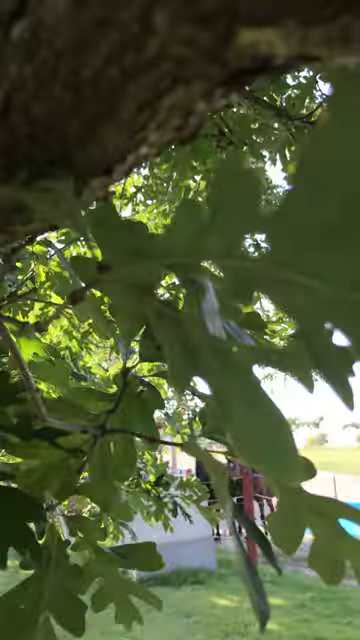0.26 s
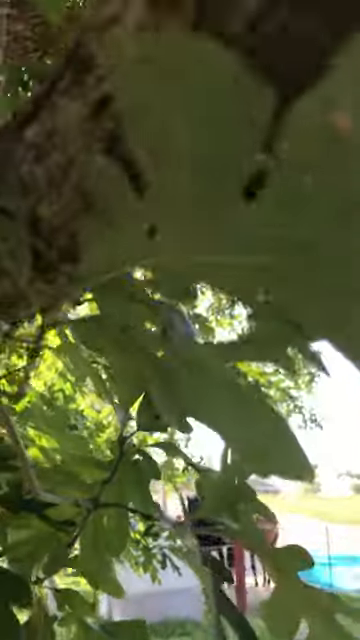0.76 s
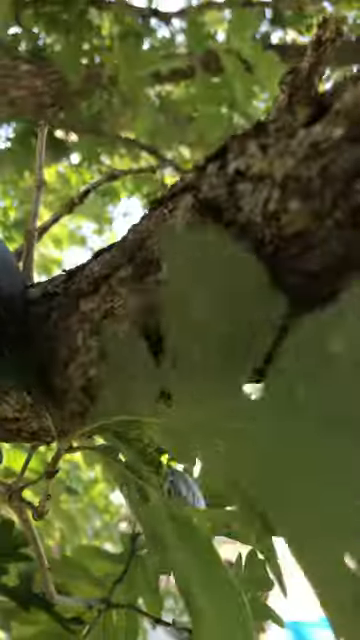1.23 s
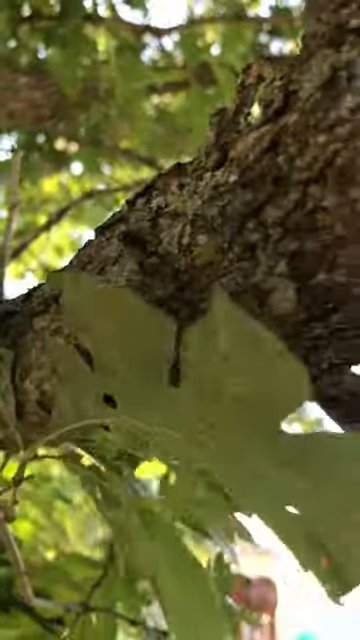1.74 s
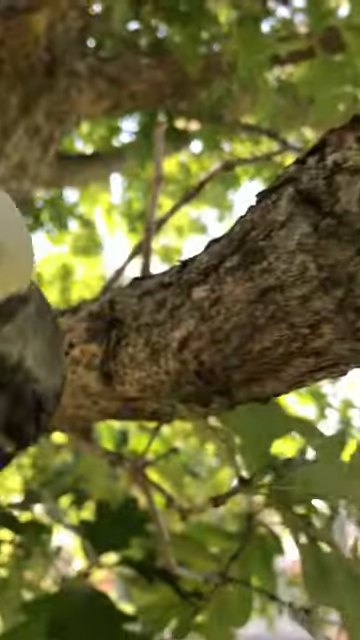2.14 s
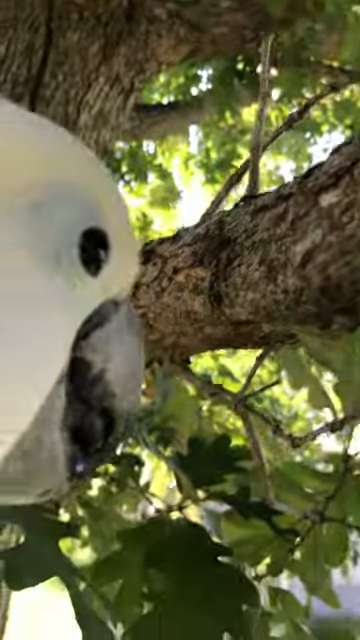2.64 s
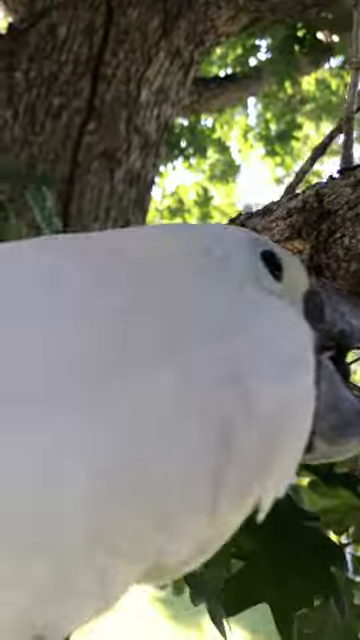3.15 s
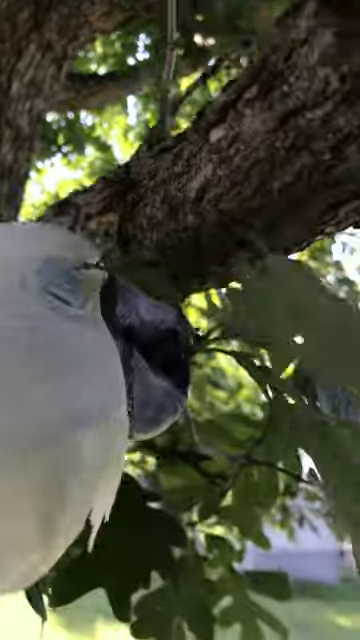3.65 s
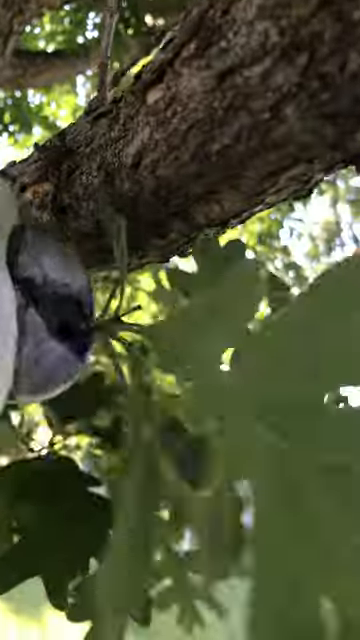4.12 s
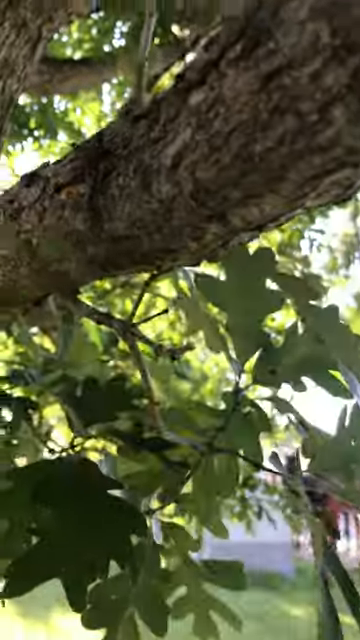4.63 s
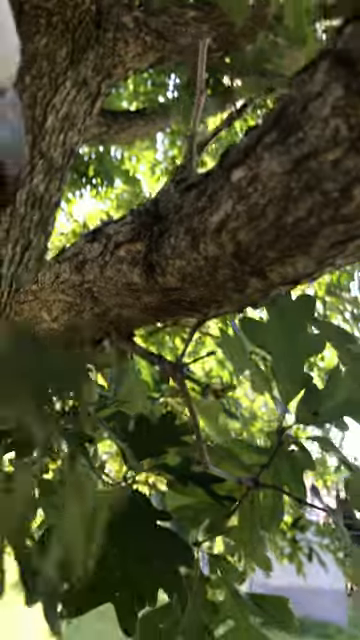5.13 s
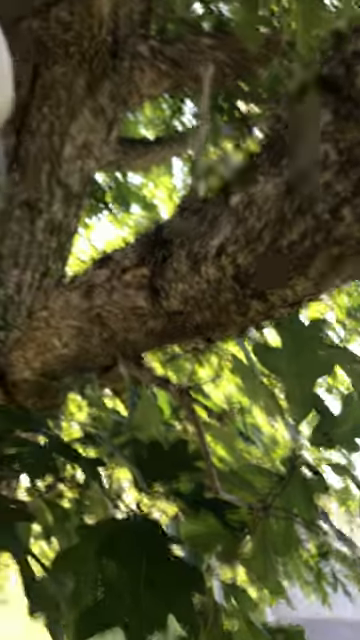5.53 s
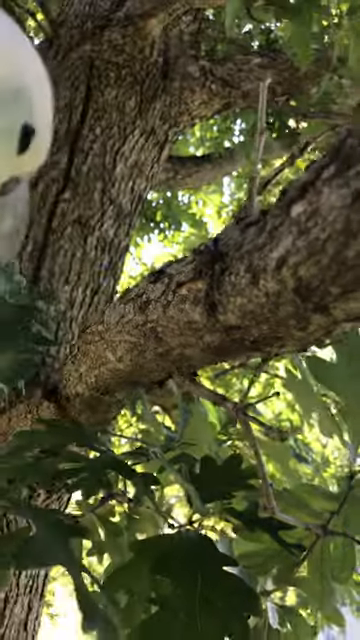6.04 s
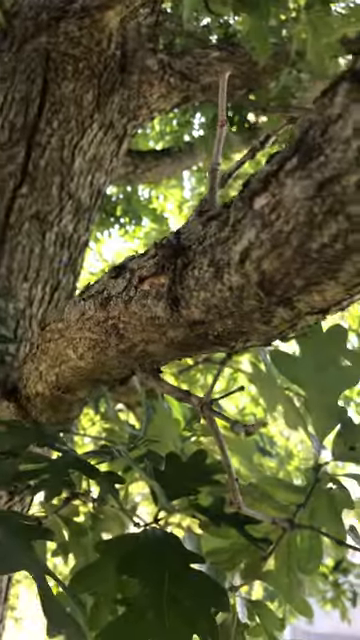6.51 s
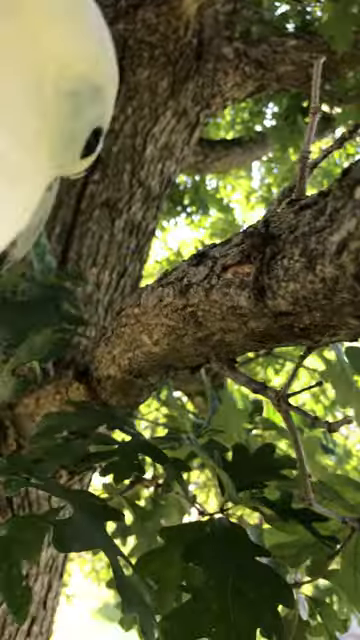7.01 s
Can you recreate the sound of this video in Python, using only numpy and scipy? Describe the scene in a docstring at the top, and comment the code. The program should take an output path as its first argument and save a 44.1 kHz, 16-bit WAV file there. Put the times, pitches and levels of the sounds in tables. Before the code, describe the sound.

Outdoors in a leafy tree, a close microphone hears a parrot working with its beak. Faint leaf brushing opens the scene; small dry crackles start around 0.5 s and thicken into a dense, bright ripping burst from 1.1 to 1.5 s. More scattered tears and scrapes follow until about 2.0 s, with a crisp one near 1.85. Then it is mostly quiet, with slight knocks at 2.3, 3.1 and 3.4 s and one tiny falling bird note far off at 2.8. A sharp twig snap comes at 4.06 s, then light rustling; the strongest woody snap hits at 5.04 with small cracks around it. Dull bumps follow, a last clean snap at 6.2, and a soft knock at 6.9. Throughout, a high insect buzz and thin trill shimmer, crickets chirp in quick threes roughly every 0.6 s, and a distant road rumble and low engine hum fade.

```python
"""In an oak, a phone among the branches hears a parrot close by, tearing leaves and snapping twigs.
Kicks and torn noise ring wood and bark; blunter contacts knock; swelling ticks and scrapes rustle.
Behind are the summer insects: sine wing strokes for crickets, pulsed tones for two trills, and humps
of flickering noise for a broad high buzz. One far bird gives a falling note; shaped noise makes the
hush and a distant road's rumble, and a wavering low sine makes its hum."""
import sys
import numpy as np
from scipy import signal
from scipy.fft import rfft, irfft
from scipy.io import wavfile
from scipy.ndimage import uniform_filter1d

SR = 44100
rng = np.random.default_rng(int(sys.argv[2]) if len(sys.argv) > 2 else 0)


def wrap_up_sound(samples):
    """Save the sound to the file named by the first command line argument, as 16-bit audio."""
    columns = np.atleast_2d(samples).T
    # keep every value between -1 and 1, then stretch to whole-number steps
    tamed = np.clip(columns, -1, 1)
    steps = np.round(tamed * 32767).astype(np.int16)
    wavfile.write(sys.argv[1], SR, steps)


N = 320585
T = np.arange(N) / SR  # s

# damped modes of the green wood: (f/Hz, width/Hz, level/dB)
BRANCH_MODES = [(650, 430, 1), (1325, 710, 26.5), (1940, 1200, -21)]
TREBLE_DB, LOW_DB = -3.5, -3  # rustle ranges against the middle one


def undb(db):
    """Turn dB into gain."""
    return 10 ** (np.asarray(db) / 20)


def unit(x):
    """Scale to rms 1."""
    return x / np.sqrt(np.mean(x ** 2))


def ring(x, hz, width_hz):
    """One resonance, gain 1 at its centre."""
    return signal.lfilter(*signal.iirpeak(hz, hz / width_hz, fs=SR), x)


def ring_twice(x, hz, width_hz):
    """Two equal resonances in a row, for steeper skirts."""
    return ring(ring(x, hz, width_hz), hz, width_hz)


def band(x, lo_hz, hi_hz):
    """Broad band-pass."""
    return signal.sosfilt(signal.butter(2, [lo_hz, hi_hz], "bandpass", fs=SR, output="sos"), x)


def walk(rate):
    """Random levels held for 1 / rate s and smoothed twice; their spread is near 1."""
    hold = int(SR / rate)
    steps = np.repeat(rng.standard_normal(N // hold + 1), hold)
    return 1.356 * uniform_filter1d(uniform_filter1d(steps, hold), hold)[:N]


def add(out, s, sound, db):
    """Mix a short sound in at time s, its peak set to db."""
    i = int(s * SR)
    out[i:i + len(sound)] += (undb(db) * sound / np.abs(sound).max())[:N - i]


def tear(noise, ms, tail_db):
    """Fibres let go for a few ms; foliage and trunk scatter a faint tail back."""
    t_ms = np.arange(len(noise)) / SR * 1000
    breaking = np.minimum(t_ms / 0.16, 1) * np.exp(-(t_ms / max(ms, .2)) ** 2)
    tail = np.minimum(t_ms / 3.2, 1) * np.exp(-t_ms / 3.2)
    return noise * (breaking + undb(tail_db) * tail)


def jolt(push, size):
    """The first fibre gives way with one sharp kick, a single sample, early in the tearing."""
    return push + size * (np.arange(len(push)) == 8)


def branch(push):
    """The green wood answers a push with all its damped modes."""
    return sum(undb(db) * ring(push, hz, width_hz) for hz, width_hz, db in BRANCH_MODES)


def snaps():
    """A kick rings branch and, a moment later, twig stub; splinters ring higher, the break hisses."""
    # twigs snapping through, peak levels: (t/s, stub f/Hz, stub level/dB, lower splinter f/Hz,
    # its level/dB, upper splinter f/Hz, its level/dB, treble level/dB, tearing time/ms)
    snap_rows = [(4.0623, 540, -29, 3130, -26.5, 5100, -15.5, -11, 0.74),
                 (5.0397, 1070, -14, 4150, -19.5, 6650, -14, -10, 0.53),
                 (6.1922, 595, -14.5, 3560, -20, 4570, -12, -17.5, 1.35)]
    branch_db = -7  # against the stub
    stub_lag_turns = 0.714  # the stub starts this many of its cycles late
    out = np.zeros(N)
    for row, noise in zip(snap_rows, rng.standard_normal((len(snap_rows), 2048))):
        s, stub_hz, stub_db, lower_hz, lower_db, upper_hz, upper_db, treble_db, ms = row
        push = tear(noise, ms, -22.5)
        add(out, s, branch(jolt(push, 28)), stub_db + branch_db)
        stub = ring(ring(jolt(push, 35), stub_hz, 0.53 * stub_hz), stub_hz, 7.2 * stub_hz)
        add(out, s + stub_lag_turns / stub_hz, stub, stub_db)
        for hz, db in ((lower_hz, lower_db), (upper_hz, upper_db)):
            splinter = ring(ring(jolt(push, 2.4), hz, 0.21 * hz), hz, 0.28 * hz)
            add(out, s, splinter, db)
        hiss = band(ring(push, 8500, 10500), 5030, 13000)
        add(out, s, hiss, treble_db)
    return out


def cracks():
    """Each break shakes the wood, a stiffer bark resonance and the air directly."""
    # cracks of leaf, bark and twig, peak levels:
    # (t/s, bark level/dB, bark f/Hz, treble level/dB, tearing time/ms)
    crack_rows = [(0.5038, -38.5, 6290, -39, 0.51), (0.579, -27, 6000, -33, 0.72),
                  (0.788, -33.5, 2750, -61, 1.8), (0.836, -43, 2880, -35, 0.81),
                  (0.8804, -42, 2260, -44, 0.73), (0.9456, -29.5, 3830, -50, 0.78),
                  (0.971, -35.5, 3530, -36, 0.78), (0.9817, -40, 4200, -46, 3.8),
                  (1.042, -44, 7110, -35, 0.91), (1.0553, -50, 7000, -33, 0.59),
                  (1.08, -58, 4650, -35, 0.42), (1.1001, -30, 5700, -21.5, 0.62),
                  (1.1273, -28, 5970, -26, 0.94), (1.163, -36, 4870, -38, 0.56),
                  (1.1825, -31, 5270, -29.5, 0.78), (1.194, -37, 4820, -38, 1.4),
                  (1.206, -35, 3700, -30, 0.44), (1.2291, -40, 7190, -24, 0.86),
                  (1.235, -28, 3630, -24, 1.7), (1.2915, -21, 6230, -10.5, 0.71),
                  (1.3031, -29, 5020, -27, 0.44), (1.318, -29, 5230, -22, 1.1),
                  (1.342, -37, 6700, -23, 0.73), (1.3497, -25, 3870, -16, 0.25),
                  (1.354, -21, 5900, -22.5, 1.3), (1.3603, -29, 5210, -27, 0.8),
                  (1.3744, -24, 6630, -26, 1.15), (1.3917, -40, 7190, -30, 1.4),
                  (1.4041, -20, 6270, -15, 1.03), (1.4105, -28, 6300, -35, 0.7),
                  (1.421, -30, 5830, -30, 1.3), (1.47, -35, 7150, -48, 1.3), (1.495, -32, 7100, -53, 1.54),
                  (1.659, -36, 3770, -37, 1.6), (1.783, -33, 6840, -45, 1.6),
                  (1.7918, -33.5, 6160, -44, 1.4), (1.8461, -26.5, 3860, -20.5, 1.75),
                  (1.861, -26.5, 4840, -47, 2.2), (1.8672, -35.5, 4090, -29, 5.2),
                  (1.879, -27.5, 6140, -44, 2.9), (1.9231, -41, 6290, -42, 3.7),
                  (1.934, -40.5, 3580, -37, 1.3), (1.9595, -38, 6010, -28, 0.7),
                  (1.9773, -30, 4400, -33, 0.41), (2.029, -32.5, 7060, -50, 5.8),
                  (3.9968, -37.5, 2800, -71, 2.1), (4.0885, -38, 2480, -29.5, 0.77),
                  (4.207, -50, 6640, -43, 1.9), (4.256, -52, 6240, -40, 0.5), (4.3947, -48, 3210, -41, 0.6),
                  (4.4438, -50, 4700, -35, 1.2), (4.907, -25.5, 4530, -37, 0.75),
                  (5.089, -41, 2840, -50, 0.8), (5.098, -31, 2640, -58, 0.82),
                  (5.1432, -39.5, 3200, -52, 2.3), (5.1706, -43.5, 3540, -46, 1.3),
                  (6.0878, -55, 3940, -41, 0.6)]
    # wood against bark for a 1 ms tear; longer tears shake it more
    wood_db, wood_db_per_doubling = -18.5, 7
    out = np.zeros(N)
    for row, noise in zip(crack_rows, rng.standard_normal((len(crack_rows), 1536))):
        s, bark_db, bark_hz, treble_db, ms = row
        push = jolt(tear(noise, ms, -15.5), 1.01)
        add(out, s, band(push, 7300, 16000), treble_db)
        add(out, s, ring_twice(push, bark_hz, 1.03 * bark_hz), bark_db)
        add(out, s, branch(push), bark_db + wood_db + wood_db_per_doubling * np.log2(ms))
    return out


def knocks():
    """Blunter contacts: a broad thump of the wood and a dull click."""
    # dull scuffs and knocks on the branch, peak levels:
    # (t/s, click level/dB, thump level/dB, thump f/Hz, contact time/ms)
    knock_rows = [(1.885, -54, -44, 220, 16), (2.2655, -43, -40, 810, 1.4), (3.1112, -38, -37.5, 260, 1.4),
                  (3.404, -39.5, -42, 1120, 3.2), (4.611, -45.5, -48.5, 364, 2.7),
                  (4.764, -40, -41.5, 360, 7.9), (4.928, -59, -47.5, 240, 2.9),
                  (4.9978, -41, -41.5, 360, 3.8), (5.049, -50, -44, 370, 4.9), (5.076, -54, -46, 420, 5.6),
                  (5.196, -49, -50.5, 400, 7.9), (5.495, -41, -46.5, 247, 4.5),
                  (5.549, -63, -47.5, 179, 7.6), (5.566, -55, -52, 500, 6.4), (5.693, -37, -41, 308, 4.9),
                  (5.712, -45, -49, 306, 3.1), (3.373, -55, -52, 1300, 1), (6.267, -58, -58, 900, 4.6),
                  (6.9035, -41, -39.5, 660, 1.3)]
    out = np.zeros(N)
    for row, noise in zip(knock_rows, rng.standard_normal((len(knock_rows), 2048))):
        s, click_db, thump_db, wood_hz, ms = row
        push = jolt(tear(noise, ms, -15), 8.8)
        add(out, s, ring_twice(push, wood_hz, 1.3 * wood_hz), thump_db)
        add(out, s, band(push, 330, 4800), click_db)
    return out


def grains(per_s, spread_db, ms):
    """Tiny bursts of noise at random moments, a few much larger than the rest."""
    when, size = rng.random((2, N))
    size_db = np.minimum(-spread_db * np.log(size + 1e-9), 24)
    hits = (when < per_s / SR) * undb(size_db)
    fall = np.exp(-1000 / (ms * SR))  # gain per sample
    return rng.standard_normal(N) * signal.lfilter([1], [1, -fall], hits)


def stirring():
    """Gains of treble, middle and low range: a slow stir plus brushes that swell and die away."""
    # how much the foliage stirs: (t/s, middle-range level/dB)
    stir_points = [(0.0, -94), (0.25, -69.5), (0.6, -69), (1.09, -65.5), (1.25, -62), (1.43, -52),
                   (1.53, -70.5), (2.0, -67.5), (2.1, -68), (2.3, -79), (3.37, -79), (3.45, -69.5),
                   (3.8, -75), (4.04, -74), (4.1, -62), (4.45, -71), (4.5, -72), (4.9, -67.5), (4.97, -76),
                   (5.1, -54), (5.25, -79), (5.45, -73.5), (5.6, -74.5), (7.27, -88)]
    # leaves brushed by beak, branch or hand:
    # (t/s, middle-range level/dB, brightness/dB, swelling time/s, dying time/s)
    brush_rows = [(0.098, -64.5, -3, .04, 0.037), (0.369, -73, 12, 0.081, 0.039), (0.487, -71, 3, .02, .03),
                  (0.649, -60.5, 8.5, 0.034, .03), (0.854, -59.5, 2, 0.023, 0.015),
                  (0.914, -58.5, 4.5, 0.013, 0.18), (1.231, -53, 7.5, 0.042, 0.047),
                  (1.357, -48, 10, 0.018, 0.036), (1.409, -46, 5.5, 0.028, 0.035),
                  (1.652, -54, 9, 0.033, 0.025), (1.79, -51, 1.5, 0.019, 0.017),
                  (1.849, -39.5, 3.5, 0.0046, 0.026), (1.91, -60, -1, 0.018, 0.037),
                  (2.034, -49, -1.5, 0.006, 0.018), (3.518, -60.5, -3, 0.029, 0.018),
                  (3.68, -67, 4.5, 0.095, 0.052), (4.066, -47, -1, 0.0017, 0.029),
                  (4.11, -73, -4, 0.023, 0.025), (4.206, -58.5, -2, .03, .02),
                  (4.29, -59, 0.5, 0.033, .035), (4.382, -57.5, 2, 0.029, 0.021),
                  (4.443, -51.5, 0.5, 0.0075, 0.011), (4.68, -72, -9, 0.056, .06),
                  (4.769, -62, 7, 0.013, 0.016), (5, -59.5, -8, 0.013, 0.018),
                  (5.042, -36.5, -1, 0.0021, 0.0084), (5.335, -53, 1, 0.026, 0.044),
                  (5.533, -62, -9, 0.033, 0.028), (6.196, -58.5, 0, .002, 0.044)]
    fade_db = 9  # lost over one swelling or dying time
    stir = undb(np.interp(T, *np.transpose(stir_points)))
    power = np.outer(undb([TREBLE_DB, 0, LOW_DB]), stir) ** 2
    for s, db, bright_db, swell_s, fade_s in brush_rows:
        near = slice(max(int((s - 4 * swell_s) * SR), 0), int((s + 4 * fade_s) * SR))
        away = np.maximum((T[near] - s) / fade_s, (s - T[near]) / swell_s)
        ranges = undb([TREBLE_DB + bright_db, 0, LOW_DB - bright_db])
        power[:, near] += np.outer(ranges, undb(db - fade_db * away)) ** 2
    return np.sqrt(power)


def rustle():
    """Leaves scrape and crease: shared broad ticks over a dense, gusty scrape in each range."""
    ticks = unit(grains(300, 3, .7))
    gusts = undb(4.2 * walk(40))
    treble_scrape = unit(gusts * grains(1200, 3, .6))
    treble = unit(band(ticks + treble_scrape, 5500, 16000))
    middle_scrape = unit(gusts * grains(800, 3, 1.1))
    middle = unit(band(ticks + middle_scrape, 1700, 6500))
    low_scrape = unit(gusts * grains(600, 1.7, 3.9))
    low = unit(band(ticks + 0.8 * low_scrape, 100, 1620))
    return np.sum(stirring() * [treble, middle, low], axis=0)


def stroke(hz, ms):
    """One wing stroke: a near sine that sags ever faster in pitch as it fades."""
    u = np.linspace(0, 1, int(ms * SR / 1000))
    swell = np.sin(np.pi * u ** 0.58) ** 1.3
    pitch_hz = hz * (1.012 - 0.049 * u ** 1.48)
    return swell * np.sin(2 * np.pi * np.cumsum(pitch_hz) / SR)


def chirper(chirps, strokes_s, hz, wobble):
    """Every chirp is the same few strokes, each a little off in pitch and size."""
    out = np.zeros(N)
    chances = rng.standard_normal((len(chirps), len(strokes_s), 2))
    for (start, db), chance in zip(chirps, chances):
        for after, (pitch, size) in zip(strokes_s, chance):
            s = start + after
            if s > 0:
                sound = stroke(hz * (1 + wobble * pitch), 24.6)
                add(out, max(s - .003, 0), sound, db + 0.51 * size)
    return out


def crickets():
    """Two chirpers and many fainter strokes at random, with a blurred echo from the yard."""
    # three-stroke chirps of the near cricket: (t/s, level/dB)
    near_chirps = [(-0.092, -53.5), (0.5526, -51), (1.1094, -51.5), (1.7624, -55), (2.4623, -56.5),
                   (3.1637, -54.5), (3.8154, -54), (4.4354, -54), (5.13, -56), (6.2692, -54),
                   (6.8224, -52.5)]
    # its chirp that breaks off after two strokes: (t/s, level/dB)
    short_chirps = [(5.806, -56.5)]
    # two-stroke chirps of a higher, farther cricket: (t/s, level/dB)
    high_chirps = [(0.0383, -69), (0.29, -63), (1.066, -59), (1.6894, -64), (2.2902, -59), (2.62, -60),
                   (2.9644, -60), (3.2794, -58), (3.5708, -61), (4.3246, -60), (5.2714, -65), (5.8944, -68),
                   (6.7464, -66), (6.98, -61)]
    near_strokes_s, near_hz = (0, .045, .096), 4670
    high_strokes_s, high_hz = (0, .042), 5080
    out = chirper(near_chirps, near_strokes_s, near_hz, 0.0024)
    out += chirper(short_chirps, near_strokes_s[:2], near_hz, .004)
    out += chirper(high_chirps, high_strokes_s, high_hz, 0.017)
    for when, pitch, size in rng.random((260, 3)):
        add(out, when * T[-1], stroke(4300 + 1000 * pitch, 26), -74 + 8 * size)
    echo = rng.standard_normal(4096) * np.exp(-np.arange(4096) / SR / .015)
    return out + undb(-35) * signal.fftconvolve(out, echo)[:N]


def trill(hz, width_hz, per_s, duty):
    """A train of short wing strokes at a slightly drifting rate, blurred by distance."""
    phase = np.cumsum(per_s * (1 + 0.0089 * walk(2.6))) / SR % 1
    gate = np.sin(np.pi * np.minimum(phase / duty, 1))
    blur = unit(ring(rng.standard_normal(N), hz, width_hz))
    tone = np.sin(2 * np.pi * hz * T) + .5 * blur
    return unit(gate * tone)


def trills():
    """A high trill runs throughout; a low one comes in bouts with short fades."""
    # bouts of the low trill: (start t/s, end t/s, level/dB)
    low_bouts = [(1.45, 1.75, -80), (2.67, 3.78, -82.5), (5.62, 6.116, -84)]
    bouts = 0
    for start, end, db in low_bouts:
        bouts = bouts + undb(db) * np.clip(np.minimum(T - start, end - T) / 0.033, 0, 1)
    high = undb(-75) * trill(9820, 150, 44.2, .6)
    return high + bouts * trill(2710, 150, 63.5, 0.68)


def bird():
    """A far bird gives one sine note that drops fast, then holds."""
    length_s, hold_hz, drop_hz = 0.075, 2880, 260
    out = np.zeros(N)
    u = np.linspace(0, 1, int(length_s * SR))
    note = np.sin(2 * np.pi * np.cumsum(hold_hz + drop_hz * np.exp(-u / 0.25)) / SR)
    add(out, 2.788, np.sin(np.pi * u) ** 0.6 * note, -77)
    return out


def chorus():
    """Many far insects merge into humps of noise, each flickering; the buzz stops short at 10 kHz."""
    # humps of the buzz: (f/Hz, width/Hz, level before flicker/dB)
    humps = [(4540, 560, -68), (5100, 460, -73), (6640, 670, -80.5), (8427, 1230, -61.5),
             (9280, 220, -71.5)]
    out = 0
    for hz, width_hz, db in humps:
        hump = ring_twice(rng.standard_normal(N), hz, width_hz)
        flicker_db = 1.2 * walk(25) + walk(1.5)
        out = out + undb(db + flicker_db) * unit(hump)
    return signal.sosfilt(signal.butter(12, 9900, fs=SR, output="sos"), out)


def air():
    """Outdoor hush as coloured noise; its rumble and roar follow the distant road."""
    # colour of the hush: (f/Hz, relative level per Hz/dB)
    colour_points = np.array([(22, -35), (38, -10.5), (52, 2.5), (110, -10.5), (150, -13), (400, -21.5),
                              (900, -25), (1400, -30.5), (2300, -38), (6000, -37.5), (10500, -54),
                              (12000, -37.5), (15500, -37)])
    # distant road: (t/s, rumble level/dB, tyre roar level/dB)
    road = [(0.0, 3.5, 0.5), (7.27, -4, -2)]
    air_db = -61  # all three parts together, before the road moves them
    hz = np.maximum(np.arange(N // 2 + 1) * SR / N, 1)
    colour = undb(np.interp(np.log(hz), np.log(colour_points[:, 0]), colour_points[:, 1]))
    noise = rfft(rng.standard_normal(N)) * colour
    rumble_share = 1 / (1 + (hz / 90) ** 4)
    hush_share = 1 / (1 + (1800 / hz) ** 4)
    rumble = irfft(noise * rumble_share, N)
    roar = irfft(noise * (1 - rumble_share - hush_share), N)
    hush = irfft(noise * hush_share, N)
    gain = undb(air_db) / np.std(rumble + roar + hush)
    s, rumble_db, roar_db = np.transpose(road)
    rumble_gain = undb(np.interp(T, s, rumble_db))
    roar_gain = undb(np.interp(T, s, roar_db))
    return gain * (rumble_gain * rumble + roar_gain * roar + hush)


def hum():
    """A far engine drones low, a sine near 49 Hz that wavers and draws away."""
    level_db = np.interp(T, [0, 2.3, 3.4], [-66, -68, -74]) + 3.5 * walk(2.9)
    pitch_hz = 49 * (1 + 0.0386 * walk(4.6))
    return undb(level_db) * np.sin(2 * np.pi * np.cumsum(pitch_hz) / SR)


def scene():
    """The beak at work close by, over the outdoor chorus; one channel."""
    beak = snaps() + cracks() + knocks() + rustle()
    background = crickets() + trills() + bird() + chorus() + air() + hum()
    return (beak + background)[None]


def record(dry):
    """Treble drops by about 26 dB near 15.8 kHz and ends at 16.7 kHz."""
    stepped = signal.sosfilt(signal.ellip(6, .2, 26, 15780, fs=SR, output="sos"), dry)
    return signal.sosfilt(signal.ellip(8, .2, 70, 16700, fs=SR, output="sos"), stepped)


dry = scene()
out = record(dry)
wrap_up_sound(out)
```